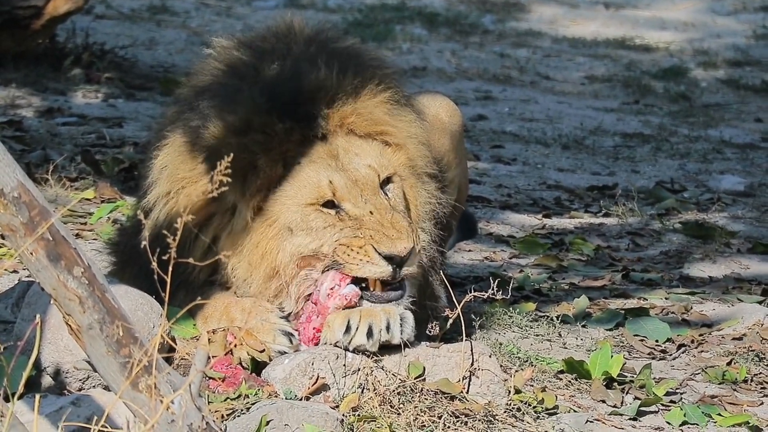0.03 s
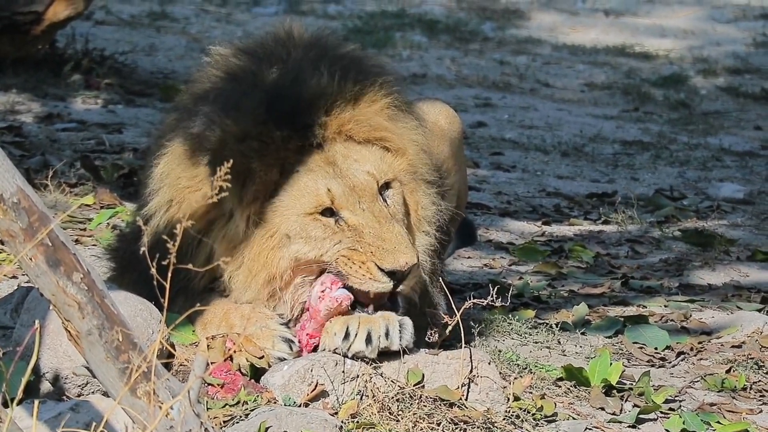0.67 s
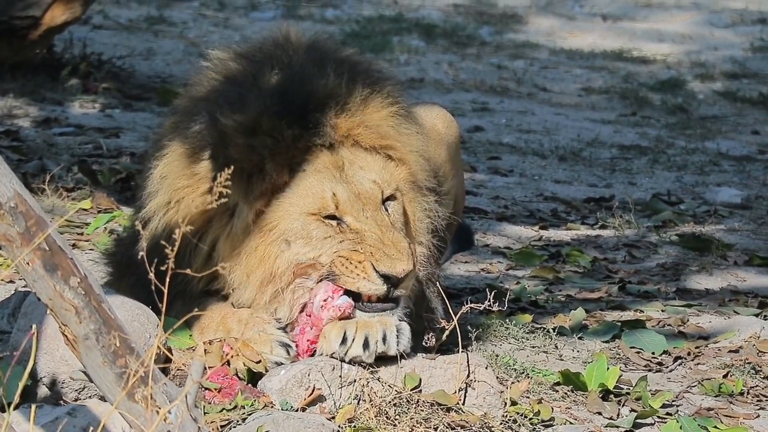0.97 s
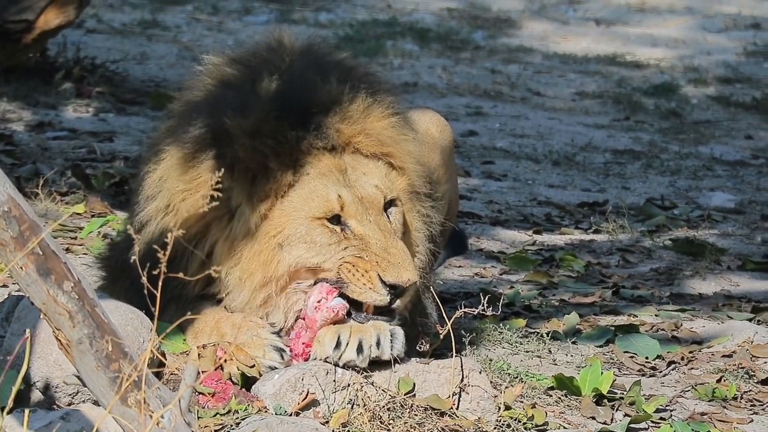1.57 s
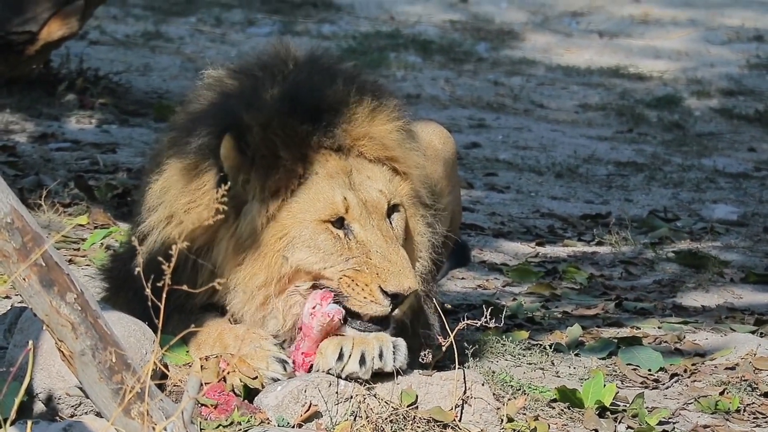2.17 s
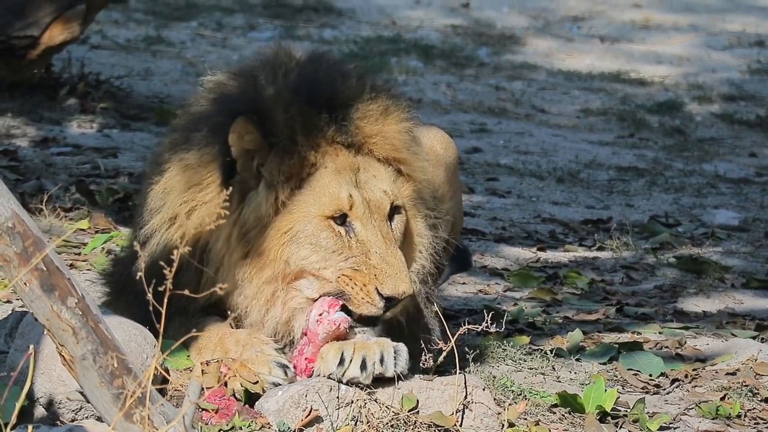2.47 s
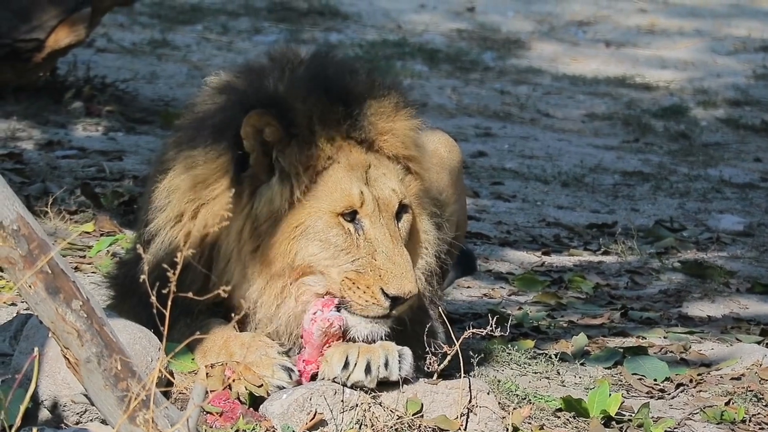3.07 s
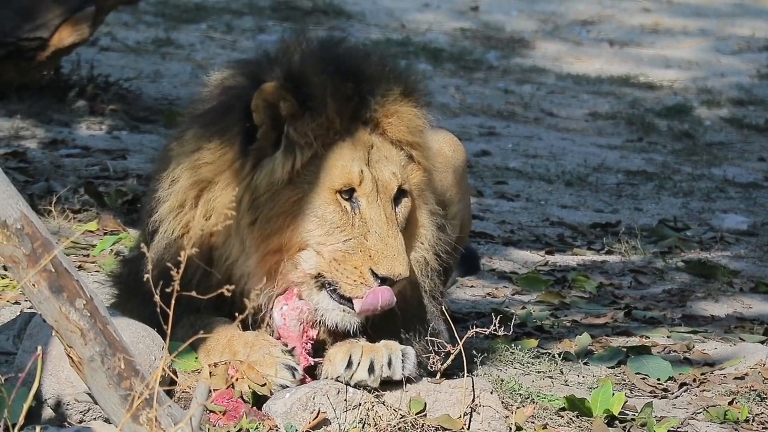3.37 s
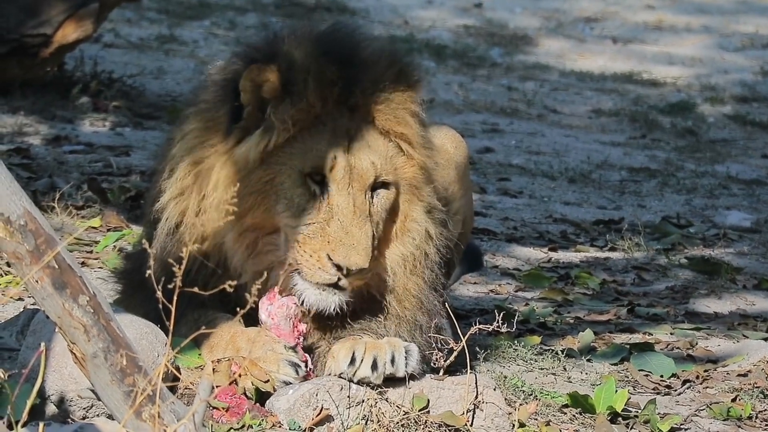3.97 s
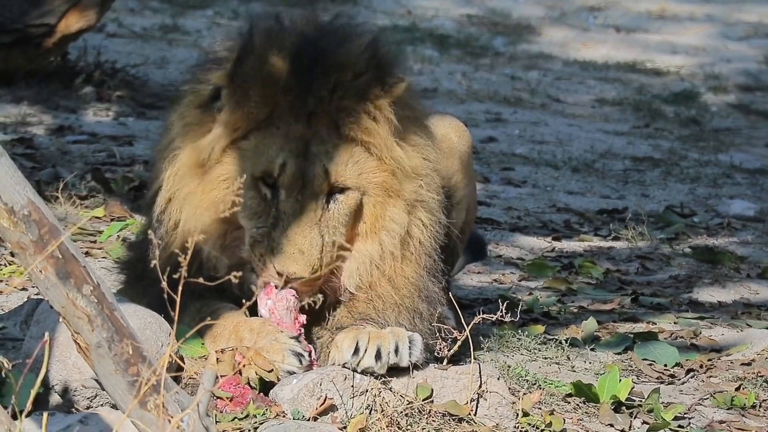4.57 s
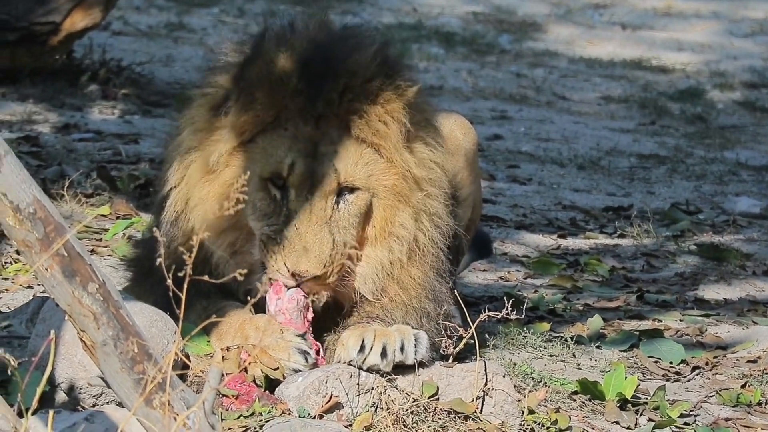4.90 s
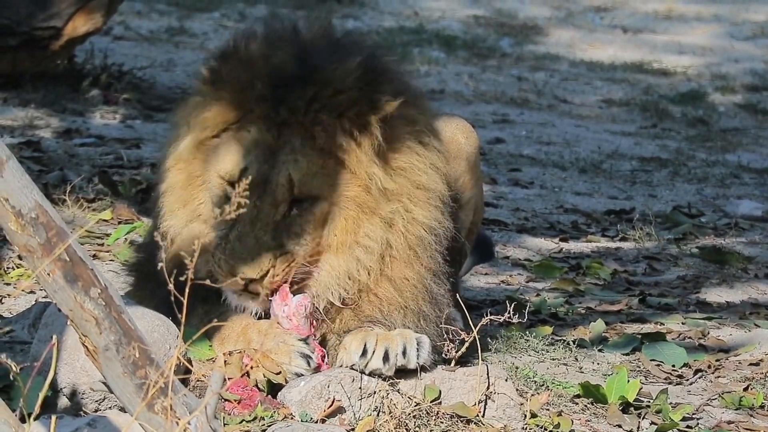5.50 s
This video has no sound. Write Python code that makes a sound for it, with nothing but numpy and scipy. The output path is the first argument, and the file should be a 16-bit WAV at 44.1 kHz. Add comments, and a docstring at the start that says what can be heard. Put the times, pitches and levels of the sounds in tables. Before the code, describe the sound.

Close, deep fluttering growls from a feeding lion: a quiet rumble, a loud growl, a moan and a long rasping rattle.

```python
"""An open enclosure, close to a lion growling over a piece of meat: a short snarl, a closed-mouth rumble,
a loud open growl, a moan that frays into a rasp, and a long rattle. His slack vocal folds flap about
17-30 times a second; each flap thumps the chest and sends a slap and a puff of air through throat and
mouth. Saliva crackles in rasp and rattle, and wet lips smack now and then. Behind him the microphone
hears a short echo off ground, rocks and walls, and a faint outdoor hush."""
import sys
import numpy as np
from scipy import signal
from scipy.fft import rfft, irfft
from scipy.io import wavfile
from scipy.ndimage import uniform_filter1d, minimum_filter1d

SR = 44100
rng = np.random.default_rng(int(sys.argv[2]) if len(sys.argv) > 2 else 0)


def wav_record(signal):
    """Record a signal, one row per channel, as 16-bit PCM in the file named by sys.argv[1]."""
    frames = np.transpose(np.atleast_2d(signal))
    bounded = np.clip(frames, -1, 1)
    # unit amplitude maps onto the largest positive 16-bit level
    quanta = np.round(bounded * 32767).astype(np.int16)
    wavfile.write(sys.argv[1], SR, quanta)


N = 244314
TIME = np.arange(N) / SR

# chest resonances in moan, rasp and rattle: (frequency [Hz], width [Hz], level [dB])
LAST_BREATH_CHEST = [(46.7, 10.2, 2.5), (99, 21.1, -3.5)]


def from_db(db):
    """Decibels to gain."""
    return 10 ** (np.asarray(db) / 20)


def rms_one(x):
    """Scale to unit rms."""
    return x / np.sqrt(np.mean(x ** 2) + 1e-20)


def steady(x, size=4000):
    """Unit level over a few flaps; single flaps keep their shape."""
    power = uniform_filter1d(uniform_filter1d(x ** 2, size), size)
    return x / np.sqrt(np.maximum(power, 1e-6 * np.mean(x ** 2)))


def in_time(curve):
    """A curve of (time [s], value) at every sample."""
    return np.interp(TIME, *np.transpose(curve))


def drift(hz):
    """A random wander of unit rms that turns hz times a second."""
    knots = rng.standard_normal(1200)
    return rms_one(np.interp(TIME * min(hz, 200), np.arange(len(knots)), knots))


def envelope(span, lag_s=0, ring_s=0):
    """Rise and fall over a span: (start [s], end [s], attack [s], release [s]); may lag and linger."""
    start_s, end_s, attack_s, release_s = span
    attack = np.clip((TIME - start_s - lag_s) / attack_s, 0, 1)
    return attack * np.clip((end_s + ring_s - TIME) / (release_s + ring_s), 0, 1)


def elapsed(span):
    """Seconds since a sound began, held once it ends."""
    return np.clip(TIME - span[0], 0, span[1] - span[0])


def butter(x, hz, kind, order=2):
    """Causal Butterworth filter."""
    return signal.sosfilt(signal.butter(order, hz, kind, fs=SR, output="sos"), x + 1e-18)


def resonate(x, hz, width_hz):
    """A resonance of gain one at its peak."""
    r = np.exp(-np.pi * width_hz / SR)
    feedback = [1, -2 * r * np.cos(2 * np.pi * hz / SR), r * r]
    return signal.lfilter(np.array([1, 0, -1]) * (1 - r * r) / 2, feedback, x + 1e-18)


def wandering(x, hz, width_hz):
    """A resonance of gain one whose centre follows a curve."""
    r = np.exp(-np.pi * abs(width_hz) / SR)
    turn = np.exp(2j * np.pi * np.cumsum(hz) / SR)
    return 2 * (turn * signal.lfilter([1 - r], [1, -r], x / turn + 1e-18)).real


def colour(x, spectrum, size=4096):
    """Minimum-phase filter with the given spectrum: nothing sounds early."""
    hz, db = np.transpose(spectrum)
    grid = np.maximum(np.fft.rfftfreq(size, 1 / SR), 1)
    gain = from_db(np.interp(np.log(grid), np.log(hz), db))
    cepstrum = irfft(np.log(gain))
    cepstrum[1:size // 2] *= 2
    cepstrum[size // 2 + 1:] = 0
    return signal.oaconvolve(x, irfft(np.exp(rfft(cepstrum))))[:len(x)]


def hush(level_db=-40.5):
    """The open air behind the lion: faint, steady, mostly low noise."""
    # outdoor spectrum: (frequency [Hz], relative level [dB])
    spectrum = [(30, -12), (48, 9.5), (75, 2), (150, 2), (300, -25), (480, -29.5), (630, -37.5),
                (1200, -38), (3000, -39), (10500, -45)]
    return from_db(level_db) * rms_one(colour(rng.standard_normal(N), spectrum))


def enclosure(x, wet_db=-16, t60_s=0.13, band_hz=(200, 4000)):
    """Ground, rocks and walls scatter a short dull echo, 6 ms behind the direct sound."""
    age = TIME[:SR // 3]
    scatter = rng.standard_normal(len(age)) * (age > .006) * from_db(-60 * age / t60_s)
    scatter = butter(scatter, band_hz, "band", order=1)
    return x + from_db(wet_db) * signal.oaconvolve(x, scatter / np.linalg.norm(scatter))[:N]


def smacks(rise_s=0.0018):
    """Films of saliva snap at the lips: brief bursts in small cavities."""
    # lip smacks: (time [s], level [dB], frequency [Hz], width [Hz], decay [s])
    snaps = [(.397, -58, 5200, 2000, .02), (0.419, -42.5, 5430, 1970, 0.015), (.422, -53, 6680, 160, 0.06),
             (.424, -49, 10700, 1200, 0.019), (2.529, -30, 4170, 600, 0.0052)]
    out = np.zeros(N)
    for s, db, hz, width, decay_s in snaps:
        age = TIME - s
        burst = np.clip(age / rise_s + .5, 0, 1) * np.exp(-np.clip(age / decay_s, 0, 20))
        out += from_db(db) * burst * rms_one(resonate(rng.standard_normal(N), hz, width))
    return out


def bubble(hz, ring_s=0.0045, swell_s=0.0013, rise_per_s=1.74):
    """A bubble of saliva bursts: a short ring that rises slightly in pitch."""
    age = TIME[:SR // 25]
    shape = (1 - np.exp(-age / swell_s)) * np.exp(-age / ring_s)
    return shape * np.sin(2 * np.pi * hz * age * (1 + rise_per_s * age / 2))


def crackle(slaps, scatter_s=0.003, detune=0.0593, uneven_db=4):
    """The mouth grows wet and slowly clears: flaps burst small bubbles, and a few large ones stand out."""
    # small saliva bubbles: (frequency [Hz], level [dB])
    small_bubbles = [(2900, -38), (3400, -39.5), (4700, -41), (5400, -45), (6300, -42)]
    # large saliva bubbles: (time [s], level [dB], frequency [Hz])
    large_bubbles = [(3.706, -30, 4850), (3.921, -27, 2950), (3.954, -34, 4610), (3.975, -27.5, 4300),
                     (4.059, -30, 3060), (4.097, -34, 3490), (4.115, -29, 4450), (4.135, -34, 3200),
                     (4.261, -27, 3000), (4.278, -35, 4830), (4.339, -29, 3530), (4.413, -31, 2870),
                     (4.452, -35, 4770), (4.603, -30, 2920), (4.635, -32, 4620), (4.662, -28, 2970),
                     (4.765, -30, 2860), (4.842, -31.5, 4700), (4.95, -29.5, 4520), (5.062, -34, 3220),
                     (5.215, -35, 4350)]
    wetness = envelope((3.55, 5.6, 0.5, 0.78))
    out = np.zeros(N + SR)
    for at in np.flatnonzero(slaps * wetness):
        chance = np.clip(rng.standard_normal((len(small_bubbles), 3)), -2, 1.5)
        for (hz, db), (late, off, size) in zip(small_bubbles, chance):
            ring = wetness[at] * from_db(db + uneven_db * size) * bubble(hz * (1 + detune * off))
            out[at + int(scatter_s * late * SR):][:len(ring)] += ring
    for s, db, hz in large_bubbles:
        ring = from_db(db) * bubble(hz)
        out[int(s * SR):][:len(ring)] += ring
    return out[:N]


def gurgle(slaps, spread_s, count=40, band_hz=(300, 7500), ring_s=0.0054, uneven_db=5):
    """Every flap bursts films of saliva, each ringing briefly at a pitch of its own."""
    at = np.repeat(np.flatnonzero(slaps), count)
    pitches = rng.uniform(*band_hz, len(at))
    late, strength = rng.standard_normal((len(at), 2)).T
    starts = np.clip(at + (spread_s * SR * late).astype(int), 0, N - 1)
    sizes = from_db(uneven_db * np.clip(strength, -2, 1))
    age = TIME[:SR // 30]
    out = np.zeros(N + len(age))
    for start, hz, size in zip(starts, pitches, sizes):
        out[start:start + len(age)] += size * np.sin(2 * np.pi * hz * age) * np.exp(-age / ring_s)
    return rms_one(out[:len(slaps)])


def effort():
    """He pushes in surges and eases off in the rumble and briefly in the growl: smooth humps in dB."""
    # surges of breath: (centre [s], width at half height [s], effort [dB])
    surges = [(0.02, 0.13, 10), (0.25, 0.054, 5.5), (0.596, 0.31, 8.5), (0.786, 0.064, 3.5),
              (1.016, 0.35, -23), (1.325, 0.17, 7.5), (2.202, 0.11, 3), (2.305, 0.028, -3),
              (2.556, 0.16, 1), (2.745, 0.048, 6.5), (2.856, 0.087, 7), (2.968, 0.028, 0),
              (3.091, 0.041, 0.5), (3.272, 0.088, 8.5), (3.446, 0.15, 4), (3.887, 0.11, 7.5),
              (4.12, 0.14, 3.5), (4.29, 0.061, 5.5), (4.478, 0.1, 8.5), (4.84, 0.26, 4.5),
              (5.107, 0.1, 6.5), (5.275, 0.13, 7), (5.498, 0.055, 7.5)]
    coarse = TIME[::100]
    humps = sum(db * .5 ** ((2 * (coarse - s) / width_s) ** 2) for s, width_s, db in surges)
    return np.interp(TIME, coarse, humps)


def flap_times(flutter):
    """The moments at which the folds close during one breath."""
    cycles = np.cumsum(in_time(flutter)) / SR
    first, last = np.interp([flutter[0][0], flutter[-1][0]], TIME, cycles)
    return np.interp(np.arange(first, last + .2), cycles, TIME)


def flaps(uneven_db=2.5, jitter_s=.0004):
    """One impulse each time the slack folds close."""
    # flutter of the folds in each of three breaths: (time [s], rate [flaps/s])
    first_breath = [(.027, 37.21), (.159, 29.98), (.657, 26.75), (.967, 17.88), (1.193, 21.23),
                    (1.551, 16.76), (1.99, 16.35)]
    second_breath = [(2.095, 22.74), (2.25, 28.87), (2.45, 28.38), (2.7, 28.65), (2.81, 30.44),
                     (2.9, 25.24), (3.0, 29.41)]
    last_breath = [(3.063, 26.0), (3.45, 27.39), (3.95, 24.82), (4.25, 23.77), (4.35, 28.09), (4.5, 22.64),
                   (4.62, 33.53), (4.78, 26.92), (4.98, 28.36), (5.08, 21.47), (5.16, 29.8), (5.25, 23.94),
                   (5.33, 30.41), (5.44, 26.79), (5.53, 16.17)]
    s = np.concatenate([flap_times(breath) for breath in (first_breath, second_breath, last_breath)])
    late, strength = rng.standard_normal((len(s), 2)).T
    at = np.clip(((s + jitter_s * late) * SR).astype(int), 0, N - 1)
    slaps = np.zeros(N)
    slaps[at] = from_db(uneven_db * strength)
    return slaps


def rebounds(slaps, count=2, gap_s=.0065, loss_db=2.5):
    """Folds driven hard bounce: weaker closures follow each one, a few milliseconds apart."""
    at, out = np.flatnonzero(slaps), slaps.copy()
    gaps_s = gap_s * rng.uniform(.6, 1.4, (len(at), count))
    for k, lag_s in enumerate(np.cumsum(gaps_s, axis=1).T):
        later = np.minimum(at + (lag_s * SR).astype(int), len(slaps) - 1)
        out[later] += slaps[at] * from_db(-loss_db * (k + 2.5))
    return out


def puffs(slaps, rise_s, fall_s):
    """Air flow swells as the folds narrow and dies after they close."""
    lag = np.arange(-SR // 16, SR // 16 + 1) / SR
    return signal.oaconvolve(slaps, np.exp(np.minimum(lag / rise_s, -lag / fall_s)), "same")


def glides(slaps, rise_s=0.0054, fall_s=0.012, leak=0.26):
    """Puffs of air ring resonances that slide as throat and jaw change shape."""
    # resonances in rumble, growl and moan: (start [s], end [s], attack [s], release [s],
    # first frequency [Hz], rise [Hz/s], width [Hz], level [dB])
    slides = [(.19, .56, .03, .03, 565, -140, 100, -55), (2.854, 3.02, 0.028, 0.025, 301, -150, 140, -21),
              (3.14, 3.254, 0.023, 0.02, 315, 550, 130, -20),
              (3.229, 3.47, 0.027, 0.05, 715, 500, 50, -28.5), (3.28, 3.55, .06, .04, 428, 30, 30, -28.5),
              (3.24, 3.59, .05, .05, 545, 170, 36, -33), (3.35, 3.54, .03, .04, 915, 0, 170, -31)]
    air = (puffs(slaps, rise_s, fall_s) + leak) * rng.standard_normal(N)
    out = np.zeros(N)
    for *span, start_hz, rise_hz_per_s, width_hz, db in slides:
        shape = envelope(span)
        on = shape > 0
        hz = start_hz + rise_hz_per_s * elapsed(span)[on]
        ring = wandering(wandering(air[on], hz, width_hz), hz, width_hz)
        out[on] += from_db(db) * shape[on] * steady(ring)
    return out


def throat_rings(closures, modes, detune=0.023, uneven_db=1.5):
    """A hard closure rings the throat briefly, each mode a little differently every time."""
    age, out = TIME[:SR // 20], np.zeros(N + SR)
    for s, peak_db in closures:
        ring = np.zeros(len(age))
        for k, (hz, width, db) in enumerate(modes):
            size, off = rng.standard_normal(2)
            decay = from_db(db + uneven_db * size) * np.exp(-np.pi * width * age)
            ring += (-1) ** k * decay * np.sin(2 * np.pi * hz * (1 + detune * off) * age)
        out[int(s * SR):][:len(age)] += from_db(peak_db) * ring / abs(ring).max()
    return out[:N]


def pops():
    """Rounded pops stand out of the closed-mouth rumble."""
    # hard closures: (time [s], peak [dB])
    closures = [(.489, -32), (.555, -36), (.595, -34), (.638, -33), (.678, -43), (1.248, -43),
                (1.292, -37.5), (1.343, -34.5), (1.397, -38.5), (1.451, -39), (1.507, -42), (1.625, -43),
                (1.669, -43), (1.685, -45), (1.73, -45), (1.812, -47), (1.940, -43)]
    # throat modes, mouth closed: (frequency [Hz], width [Hz], level [dB])
    modes = [(620, 39, 2.5), (800, 45, -5.5), (1005, 42, -7.5), (1640, 67, -8.5)]
    return throat_rings(closures, modes)


def knocks():
    """From the growl on, some flaps slap shut much harder than their neighbours."""
    # hard closures: (time [s], peak [dB])
    closures = [(2.138, -15), (2.215, -16), (2.278, -28), (2.322, -31), (2.351, -16), (2.43, -20),
                (2.494, -16), (2.529, -11), (2.564, -10), (2.703, -10), (2.807, -18), (2.919, -13),
                (2.951, -20), (3.065, -15), (3.103, -8.5), (4.18, -28), (4.305, -17), (4.341, -13.5),
                (4.499, -11.5), (4.578, -19.5), (4.702, -20), (4.737, -19), (4.813, -16), (4.877, -15),
                (5.025, -19.5), (5.400, -20.5), (5.438, -22), (5.477, -10.5)]
    # throat modes: (frequency [Hz], width [Hz], level [dB])
    modes = [(556, 65, 2), (796, 690, 2), (1290, 240, -3.5), (1720, 510, -12), (3200, 190, -20.5)]
    return throat_rings(closures, modes)


def moan_tone(level_db=-13.5, jitter=.031, shimmer_db=2.6):
    """The folds tighten into a firm tone that wobbles and sags in pitch as it fades."""
    # pitch of the folds: (time [s], frequency [Hz])
    pitch = [(3.07, 233), (3.11, 233.5), (3.15, 213.2), (3.185, 223.2), (3.225, 240.2), (3.26, 207),
             (3.31, 189.8), (3.36, 195), (3.42, 225.3), (3.52, 218.3)]
    # harmonics: (multiple of the pitch, level [dB])
    partials = [(1, 3), (2, -18), (3, -18.5)]
    phase = 2 * np.pi * np.cumsum(in_time(pitch) * (1 + jitter * drift(120))) / SR
    tone = sum(from_db(db) * np.sin(k * phase) for k, db in partials)
    shape = envelope((3.062, 3.63, 0.025, 0.64))
    return shape * from_db(level_db + shimmer_db * drift(70)) * rms_one(tone)


def register_gains(span, levels, bass_lag_s, waver_db=0.7, waver_hz=14):
    """Chest, throat, mouth and breath follow the effort; the two low ones linger and may catch late."""
    from_middle_s = elapsed(span) - (span[1] - span[0]) / 2
    bass, treble = envelope(span, bass_lag_s, ring_s=.022), envelope(span)
    effort_db = effort()
    swing_db = effort_db - np.average(effort_db, weights=treble)
    return [shape * from_db(db + trend * from_middle_s + share * swing_db + waver_db * drift(waver_hz))
            for (db, trend, share), shape in zip(levels, (bass, bass, treble, treble))]


def chest_thumps(slaps, flow, modes, tension, churn, droop, slacken_s=0.012):
    """Flaps and churning air ring the chest; each thump starts sharp by the share `droop`."""
    push = rms_one(slaps) + churn * rms_one(flow * rng.standard_normal(len(flow)))
    jolt = signal.lfilter([1], [1, -np.exp(-1 / (slacken_s * SR))], np.sign(slaps) + 1e-18)
    tuning = tension * (1 + droop * jolt)
    ring = sum((-1) ** k * from_db(db) * wandering(push, hz * tuning, width)
               for k, (hz, width, db) in enumerate(modes))
    return butter(ring, [28, 190], "band", order=3)


def bout(slaps, levels, tract, formants, chest_modes, span, seal_s, leak, slap_db, wet_db, spread_s,
         rise_s, fall_s, churn, wander, bend_per_db=-0.023, droop=0, bass_lag_s=0, bounces=False):
    """One call: thumps ring the chest; slaps, gurgle and puffs of turbulence ring the vocal tract."""
    gains = register_gains(span, levels, bass_lag_s)
    sounding = sum(gains) > 0
    slaps = slaps[sounding]
    closures = rebounds(slaps) if bounces else slaps
    # the folds seal over seal_s until only `leak` of the air passes between flaps
    loose = np.clip(1 - elapsed(span)[sounding] / seal_s, 0, 1)
    flow = puffs(closures, rise_s, fall_s) + leak + (1 - leak) * loose
    saliva = from_db(wet_db) * (1 - 0.73 * loose) * gurgle(closures, spread_s)
    tension = 1 + bend_per_db * effort()[sounding]
    chest = chest_thumps(slaps, flow, chest_modes, tension, churn, droop)
    air = steady(flow * rng.standard_normal(len(flow)))
    # soft tissue slaps with no sharp top, and more gently while still loose
    soft_slaps = from_db(slap_db - 9 * loose) * rms_one(butter(closures, 2620, "low"))
    voice = colour(air + soft_slaps + saliva, tract)
    stretch = 1 + wander * drift(hz=22)[sounding]    # the soft walls never hold still
    for hz, width, lift_db in formants:    # a negative lift is a hollow cut by a side cavity
        voice = voice + (from_db(lift_db) - 1) * wandering(voice, hz * stretch, width)
    throat = butter(voice, [170, 430], "band", order=3)
    mouth = butter(voice, [430, 2300], "band", order=4)
    breath = butter(voice, 2300, "high", order=4)
    out = np.zeros(N)
    for gain, register in zip(gains, (chest, throat, mouth, breath)):
        out[sounding] += gain[sounding] * steady(register)
    return out


def snarl(slaps):
    """A short, airy outburst that dies quickly."""
    # chest, throat, mouth, breath: (level [dB], trend [dB/s], share of effort)
    levels = [(-16.5, 25, 0.47), (-18.5, -69, 0.8), (-21, -36, 0.19), (-41.5, -68, 0.66)]
    # vocal tract colour: (frequency [Hz], level [dB])
    tract = [(88, -16), (150, 11), (186, -14), (382, -18.5), (500, -25.5), (588, -24.5), (729, -24),
             (1060, -25), (1340, -30), (2610, -32.5), (3070, -24), (6420, -23), (11000, -36), (14300, -86),
             (22000, -120)]
    # tract and chest resonances: (frequency [Hz], width [Hz], gain [dB])
    formants = [(258, 30, 8), (315, 37, 7.5), (380, 31, 9.5), (490, 50, 0), (556, 29, 12.5), (598, 33, 6.5),
                (853, 32, 10.5), (1050, 41, 8.5), (1135, 54, 9.5), (2560, 50, 13), (4130, 810, 4)]
    chest = [(70.5, 13, 3), (117.5, 16, 5.5), (153, 20, 4)]
    return bout(slaps, levels, tract, formants, chest, span=(-0.014, .19, .015, 0.11),
                seal_s=0.028, leak=0.99, slap_db=-14, wet_db=-22, spread_s=0.005,
                rise_s=0.0055, fall_s=0.0048, churn=2.8, wander=0.0063)


def rumble(slaps):
    """Mouth closed: two swells with a lull between, slowing into separate thumps that droop in pitch."""
    # chest, throat, mouth, breath: (level [dB], trend [dB/s], share of effort)
    levels = [(-33.5, -5, 0.18), (-51.5, -7.5, 0.94), (-60, 1, 0.55), (-67.5, -6, 1)]
    # vocal tract colour: (frequency [Hz], level [dB])
    tract = [(88, -13), (150, 7), (188, -14), (259, -17.5), (352, -29.5), (590, -13.5), (714, -18.5),
             (984, -28), (1450, -35), (1650, -44), (1810, -47.5), (4680, -62), (7000, -67), (9100, -90),
             (15400, -120)]
    # tract and chest resonances: (frequency [Hz], width [Hz], gain [dB])
    formants = [(302, 30, -4), (430, 21, 6), (626, 70, 9.5), (805, 62, 8), (980, 67, 10), (1380, 70, 5),
                (1700, 150, 10.5)]
    chest = [(47.7, 6.9, 0.83), (90, 25, -5), (124, 20, 0.17)]
    return bout(slaps, levels, tract, formants, chest, span=(0.14, 2.03, 0.067, 0.026),
                seal_s=0.84, leak=0.33, slap_db=-13, wet_db=-8.5, spread_s=.003,
                rise_s=0.011, fall_s=0.0042, churn=0.23, wander=0.022, bend_per_db=0.0075, droop=0.16)


def moan(slaps):
    """A throaty moan whose weight sinks into the chest."""
    # chest, throat, mouth, breath: (level [dB], trend [dB/s], share of effort)
    levels = [(-23.5, 0, 0.12), (-21.5, -31, 0.18), (-29, -4, 0.88), (-45, -12.5, 0.75)]
    # vocal tract colour: (frequency [Hz], level [dB])
    tract = [(88, -58), (150, 13.5), (227, 7.5), (292, -1), (433, -15.5), (655, -22), (921, -17),
             (1820, -27), (2260, -37), (2480, -33), (5080, -29), (8710, -45), (11000, -39.5), (14300, -93),
             (22000, -120)]
    # tract resonances: (frequency [Hz], width [Hz], gain [dB])
    formants = [(336, 83, 2.2), (430, 84, 4.8), (570, 63, 6.7), (890, 94, 3.7), (1333, 45, 5.5),
                (1920, 70, 5.3), (2465, 240, 9.4)]
    return bout(slaps, levels, tract, formants, LAST_BREATH_CHEST, span=(3.04, 3.65, 0.025, 0.046),
                seal_s=0.17, leak=0.98, slap_db=-25, wet_db=-7.5, spread_s=.005,
                rise_s=0.04, fall_s=0.037, churn=1.0, wander=0.012)


def rasp(slaps):
    """The moan frays into a leaky, hissing rasp."""
    # chest, throat, mouth, breath: (level [dB], trend [dB/s], share of effort)
    levels = [(-22, 10, 0), (-27, -6.5, 0), (-31, 1, 0.2), (-44, 5.5, 0.86)]
    # vocal tract colour: (frequency [Hz], level [dB])
    tract = [(88, -45), (150, 8.5), (231, 5), (313, -13.5), (396, -20), (491, -12), (729, -16), (827, -13),
             (972, -19.5), (1440, -22), (1890, -21), (3130, -26.5), (4900, -30), (8870, -44.5),
             (11000, -37), (14300, -66), (22000, -120)]
    # tract resonances: (frequency [Hz], width [Hz], gain [dB])
    formants = [(211.4, 49, -9.5), (432, 73, 5.5), (650, 80, 4.5), (827, 70, 2.5), (1900, 360, -14.5),
                (2555, 330, -11), (3290, 370, 5.5)]
    return bout(slaps, levels, tract, formants, LAST_BREATH_CHEST, span=(3.55, 4.25, 0.054, 0.048),
                seal_s=0.077, leak=1.0, slap_db=-20.5, wet_db=-6.5, spread_s=.004,
                rise_s=0.04, fall_s=0.009, churn=1.0, wander=0.051)


def rattle(slaps):
    """A long wet rattle of distinct beats that slowly fades."""
    # chest, throat, mouth, breath: (level [dB], trend [dB/s], share of effort)
    levels = [(-24, -3, 0.94), (-31, -2, 0.49), (-36.5, -7.5, 0.53), (-45.5, -7, 0)]
    # vocal tract colour: (frequency [Hz], level [dB])
    tract = [(88, -43), (150, 6.5), (170, 8), (227, 0), (313, -14), (355, -23), (518, -1.5), (740, -6),
             (1030, -11), (1340, -16), (2300, -37.5), (2910, -34), (4020, -38.5), (4730, -35),
             (8710, -55.5), (11000, -47), (14300, -99), (22000, -120)]
    # tract resonances: (frequency [Hz], width [Hz], gain [dB])
    formants = [(239, 39, 3.8), (340, 54, 3.5), (521, 43, 7.3), (630, 130, 1.9), (796, 120, 4.5),
                (1430, 200, 2), (2400, 260, -4), (3280, 350, 2), (4560, 280, 1.3)]
    return bout(slaps, levels, tract, formants, LAST_BREATH_CHEST, span=(4.19, 5.545, .04, .02),
                seal_s=0.1, leak=.5, slap_db=-17, wet_db=-5.5, spread_s=.003,
                rise_s=.02, fall_s=0.0026, churn=1.0, wander=0.022)


def growl(slaps):
    """Mouth open and loud: air comes first, then the chest catches; every flap cracks several times."""
    # chest, throat, mouth, breath: (level [dB], trend [dB/s], share of effort)
    levels = [(-16.5, 3, 0.21), (-25, 11.5, 0.21), (-25.5, 2, 0.68), (-33.5, 18, 0.96)]
    # vocal tract colour: (frequency [Hz], level [dB])
    tract = [(88, -30), (150, -10), (189, 10.5), (267, 7.5), (518, 1), (842, -10), (972, -5.5),
             (1230, -6.5), (1700, -19), (2810, -36.5), (3360, -34.5), (5270, -36), (7960, -45),
             (8710, -51.5), (11000, -42), (14300, -91), (22000, -120)]
    # tract and chest resonances: (frequency [Hz], width [Hz], gain [dB])
    formants = [(249, 23, 8), (355, 31, 4.5), (626, 320, 3.5), (967, 60, 5), (1272, 300, -20),
                (1465, 110, 2), (1663, 110, 6), (2116, 53, 7.5), (2650, 300, -5), (3630, 330, 7.5),
                (5180, 340, 6)]
    chest = [(47, 14.4, -4), (83.6, 23.4, -4), (113, 20, -1)]
    return bout(slaps, levels, tract, formants, chest, span=(2.0, 3.04, 0.077, 0.044),
                seal_s=0.48, leak=.3, slap_db=-9, wet_db=-3, spread_s=.003,
                rise_s=0.0043, fall_s=.008, churn=.7, wander=0.053, bass_lag_s=0.093, bounces=True)


def limiter(x, ceiling=0.42, size=220):
    """The gain ducks for a few milliseconds wherever a peak would pass the ceiling."""
    gain = minimum_filter1d(ceiling / np.maximum(abs(x), ceiling), size)
    return x * uniform_filter1d(gain, size)


def scene():
    """One microphone near the lion, hush behind; all he does after the snarl is held under a ceiling."""
    slaps = flaps()
    bouts = rumble(slaps) + growl(slaps) + moan(slaps) + rasp(slaps) + rattle(slaps)
    lion = bouts + knocks() + pops() + moan_tone() + glides(slaps) + crackle(slaps) + smacks()
    background = hush()
    return (background + enclosure(snarl(slaps)) + limiter(enclosure(lion)))[None]


def record(dry, ceiling=.85, cutoff_hz=10850):
    """The microphone chain rounds the peaks and cuts the top."""
    rounded = ceiling * np.tanh(dry / ceiling)
    return signal.sosfilt(signal.ellip(10, .1, 80, cutoff_hz, fs=SR, output="sos"), rounded)


dry = scene()
out = record(dry)
wav_record(out)
```